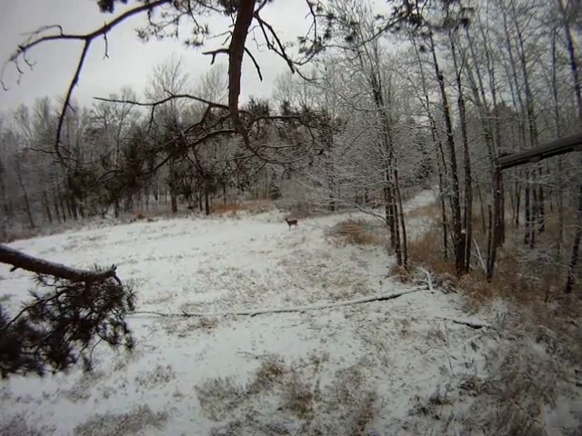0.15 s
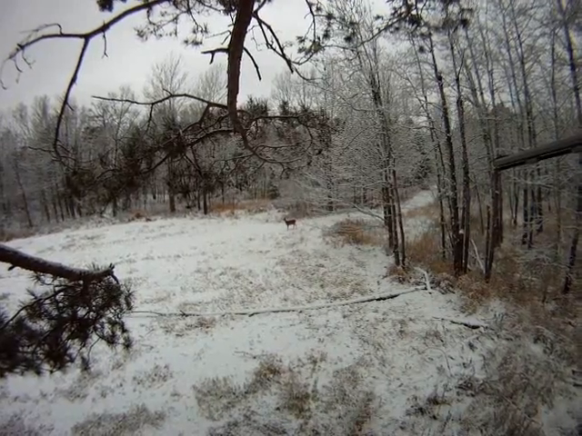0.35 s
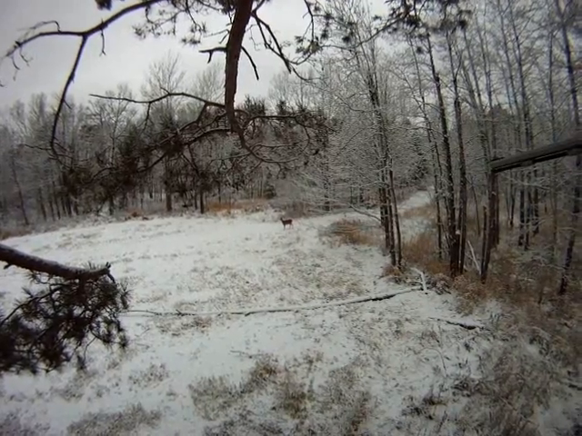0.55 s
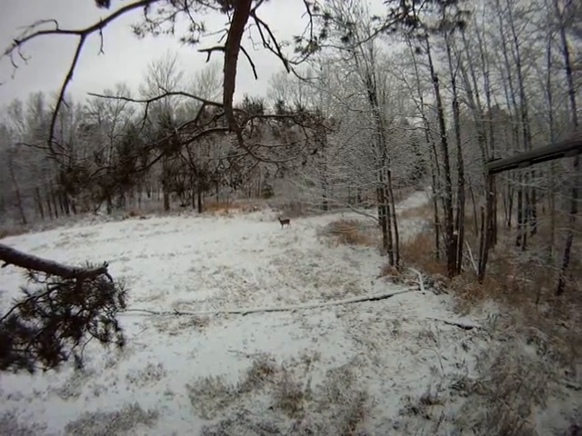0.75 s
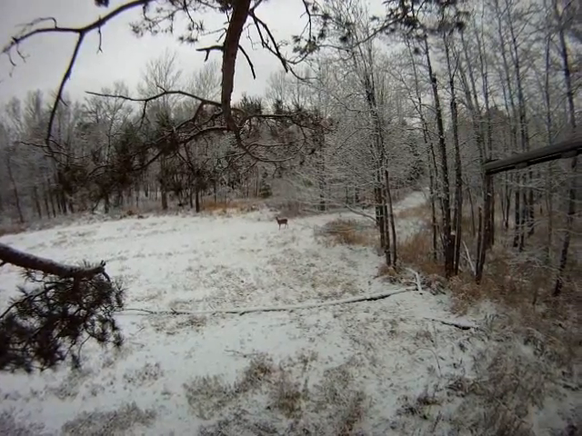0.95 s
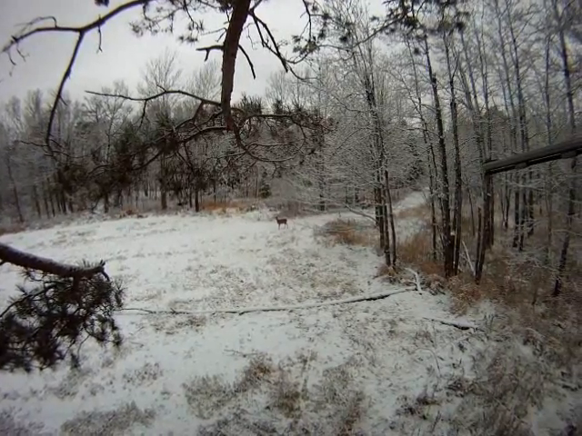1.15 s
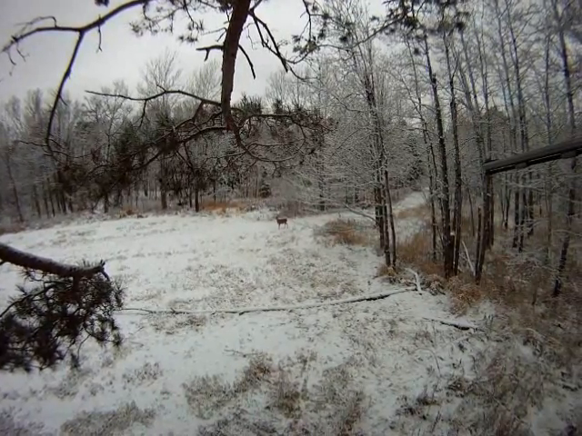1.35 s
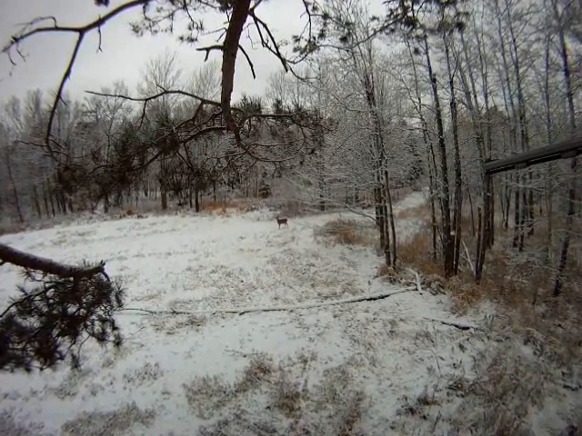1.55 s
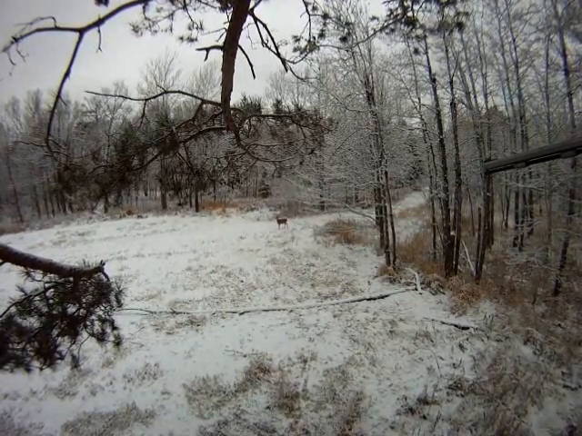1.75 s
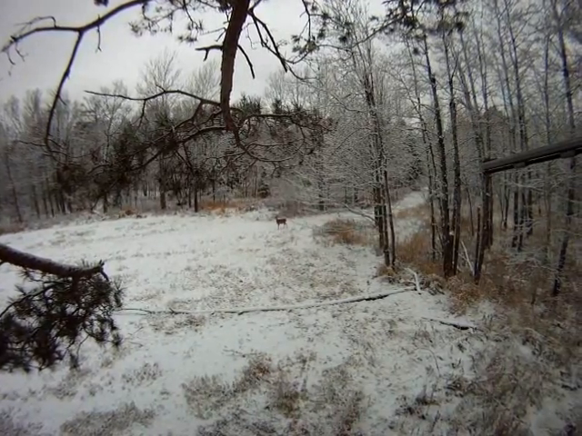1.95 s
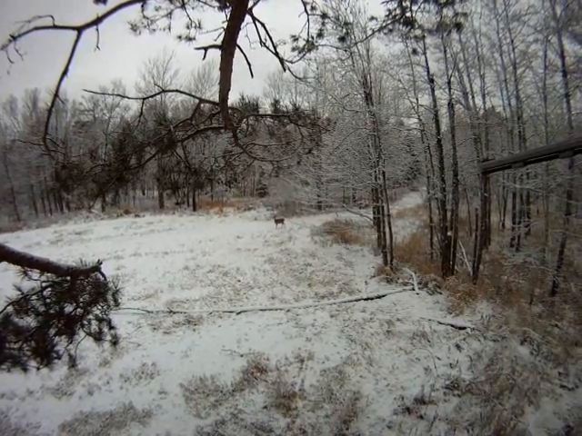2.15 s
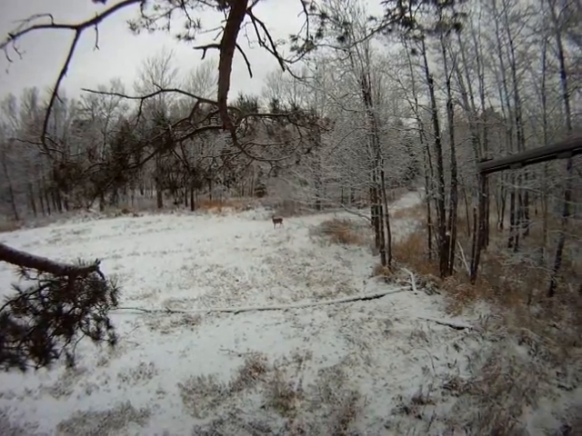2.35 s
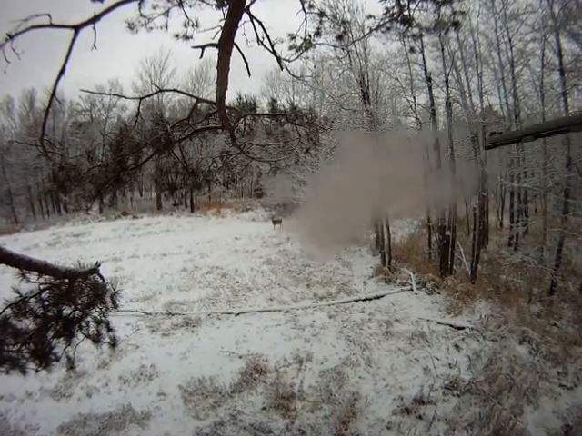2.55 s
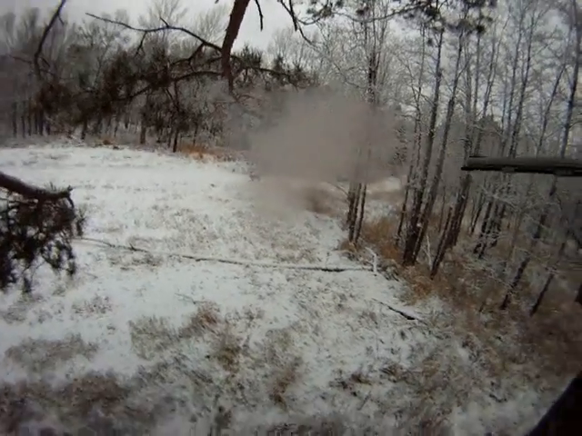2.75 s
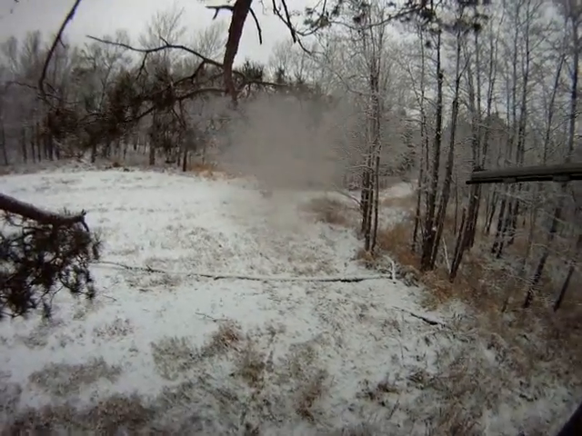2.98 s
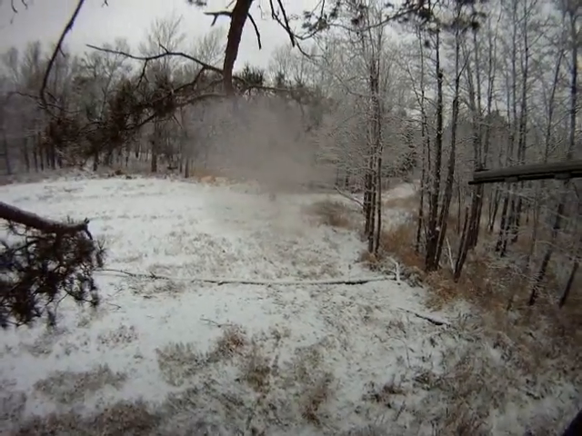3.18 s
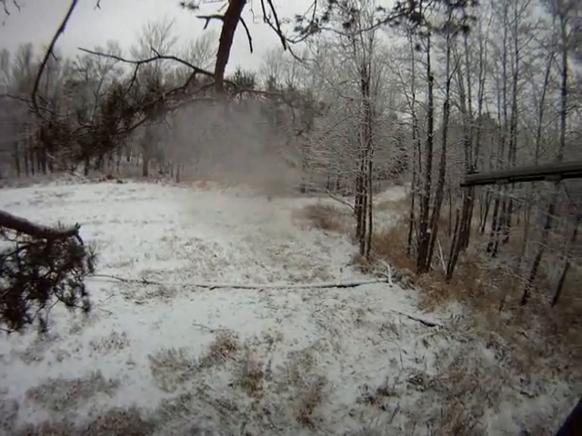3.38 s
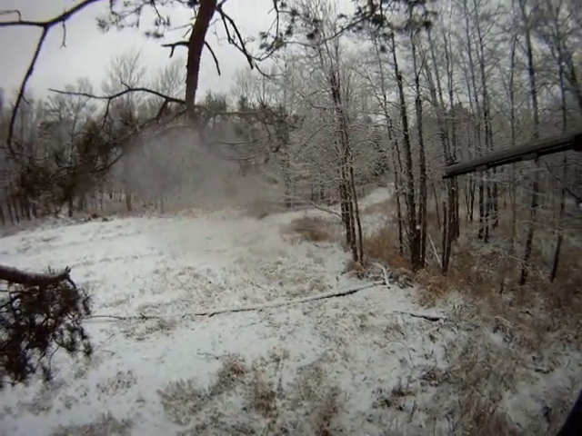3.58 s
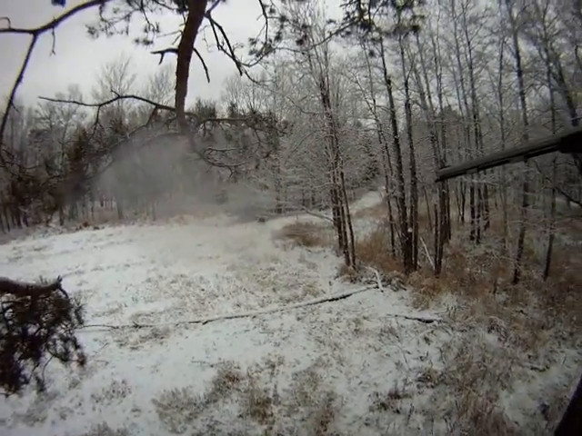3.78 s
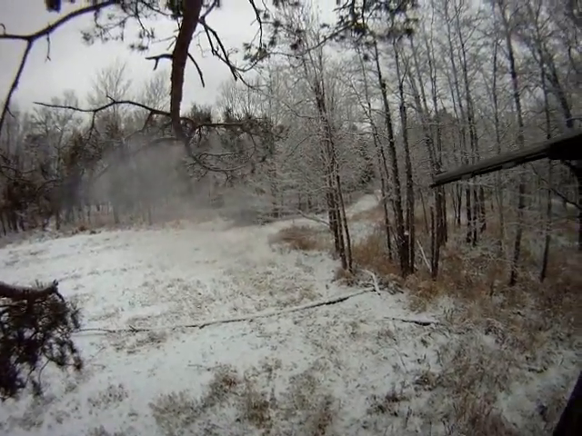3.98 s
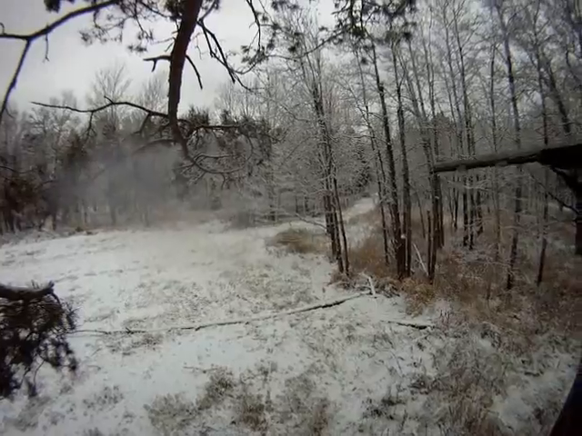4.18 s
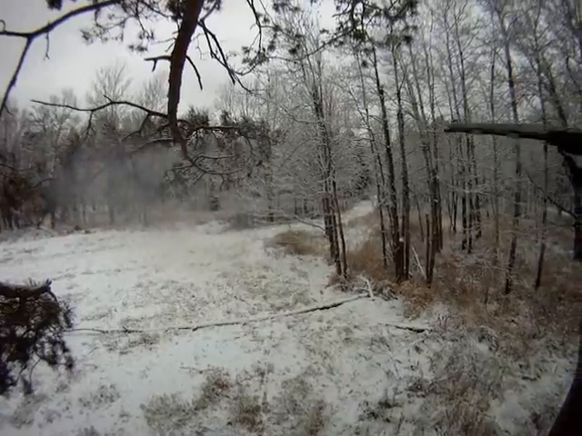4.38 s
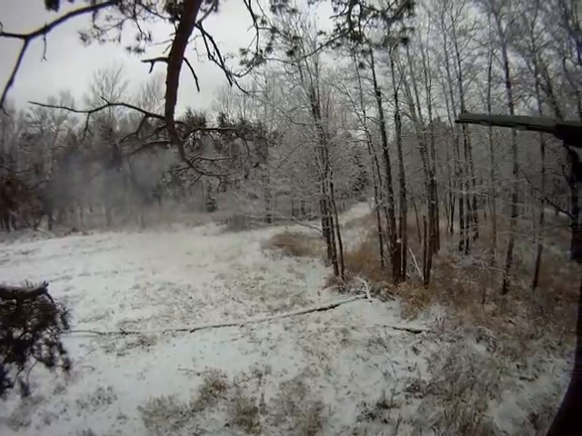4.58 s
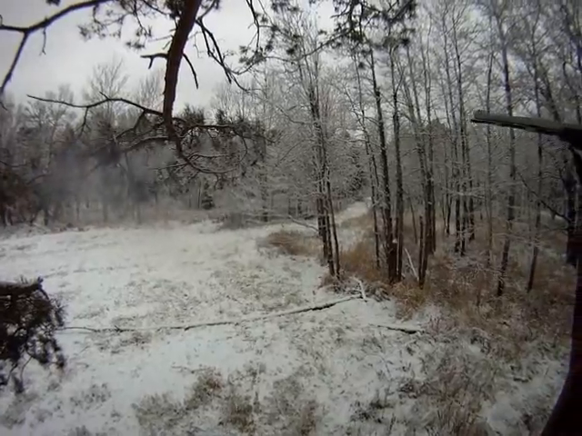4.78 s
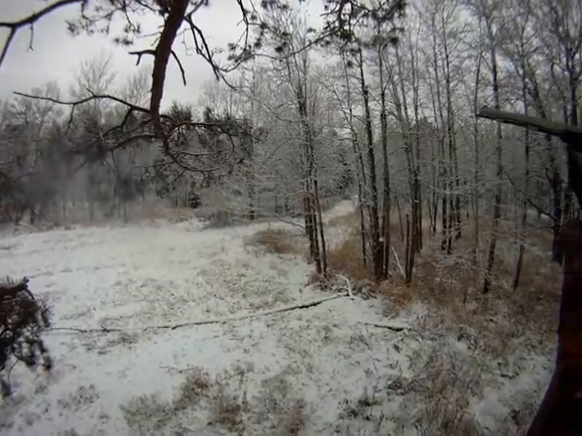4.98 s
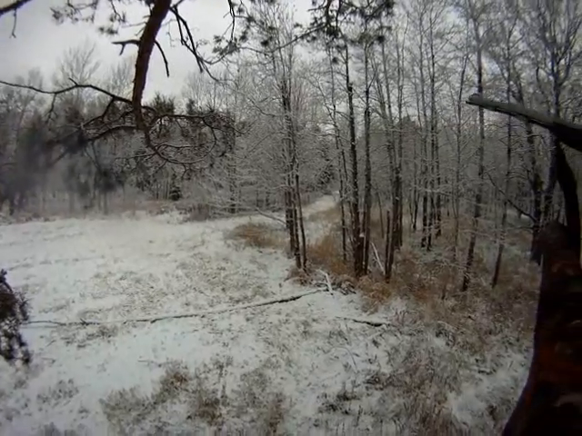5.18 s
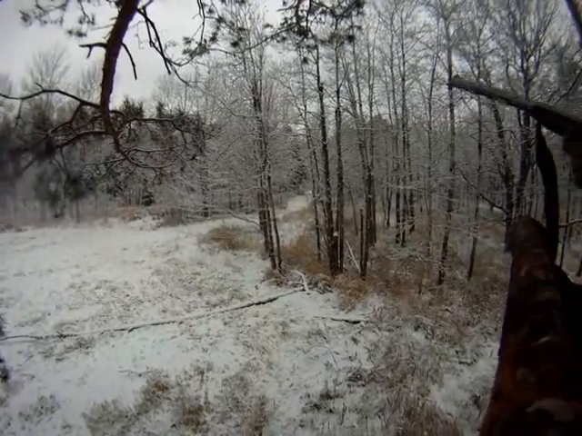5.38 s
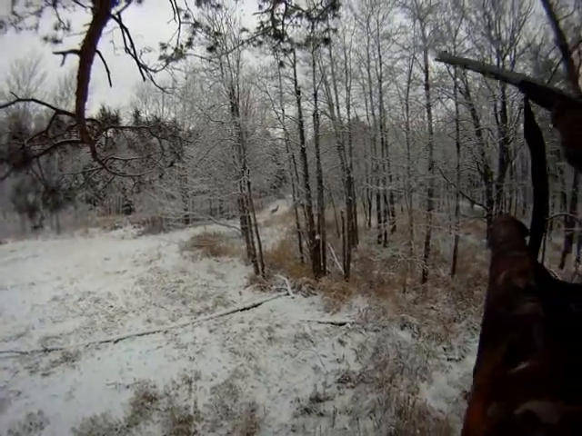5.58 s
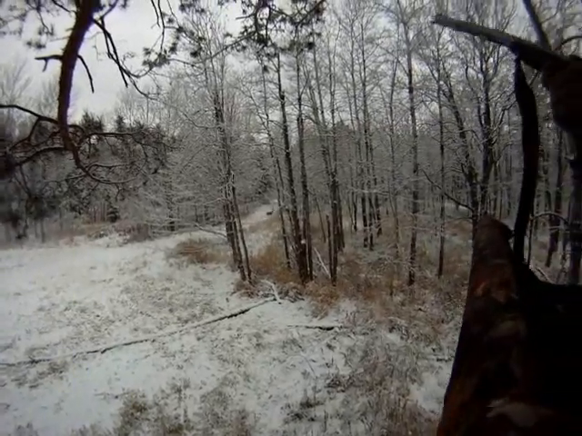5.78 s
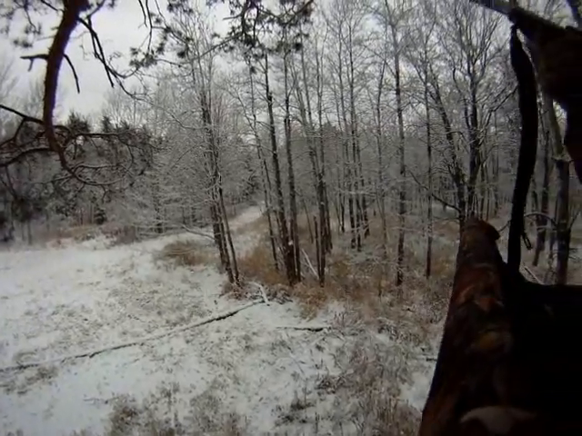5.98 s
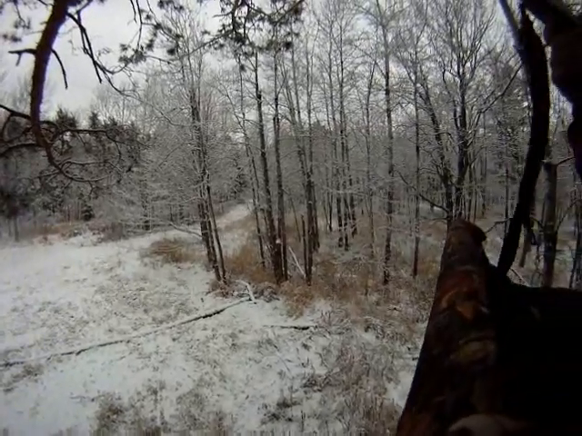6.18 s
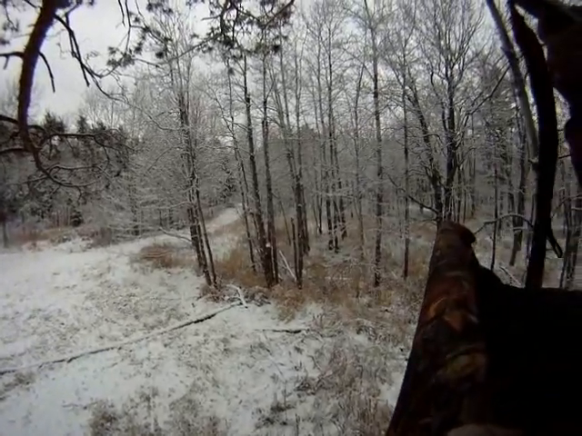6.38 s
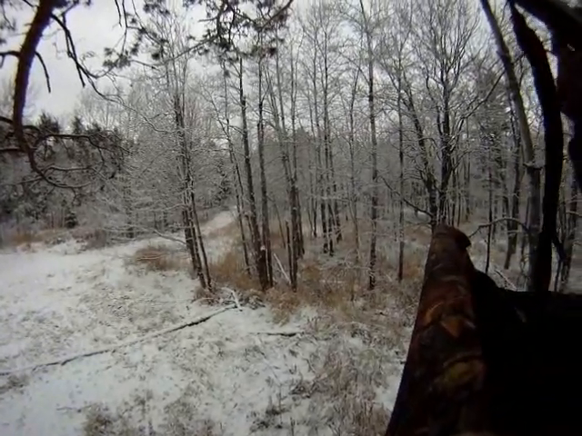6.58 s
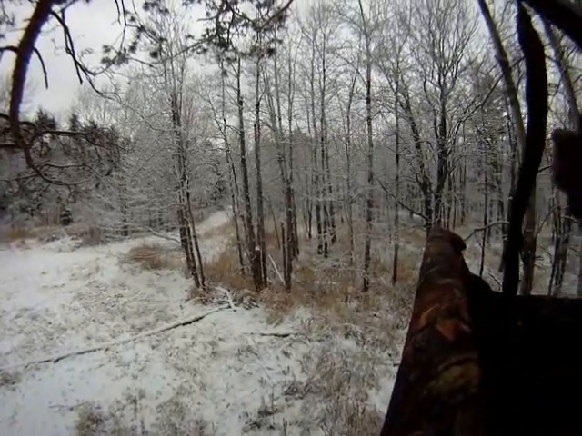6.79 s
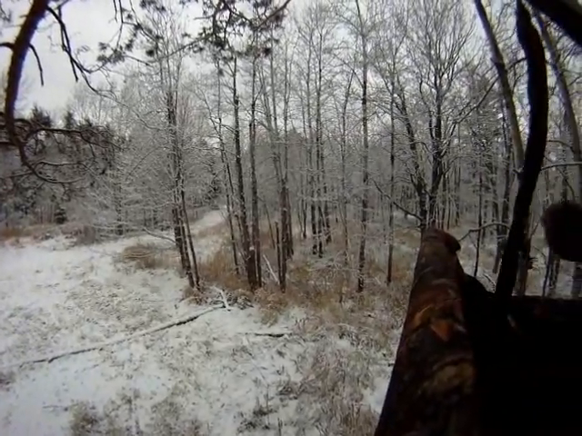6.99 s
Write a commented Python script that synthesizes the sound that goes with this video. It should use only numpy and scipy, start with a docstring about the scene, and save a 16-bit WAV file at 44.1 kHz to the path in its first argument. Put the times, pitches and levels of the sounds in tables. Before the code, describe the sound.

Quiet low rumble and faint ticks in a snowy clearing, then one sudden overloaded gunshot, woodland echoes, scratchy cloth rubbing and airy rustling.

```python
"""Low rumble, faint rustles and small ticks, then a gunshot with echoes, rubbing cloth and more rustling.
A muzzleloader is fired from a tree stand over a snowy clearing, near a microphone in a closed plastic case.
The shot is overloaded noise plus a pressure snap and a thump; trees scatter it back as dense clicks.
Cloth on the case and cloth in the air are clicks too, coloured by the hollow case; ticks are cracks with a ring.
Shaking of the mount is low noise that swells at each jolt, and soft hiss lies under it all."""
import sys
import numpy as np
from scipy import signal
from scipy.fft import rfft, irfft, next_fast_len
from scipy.io import wavfile
from scipy.ndimage import uniform_filter1d, map_coordinates

SR = 44100
rng = np.random.default_rng(int(sys.argv[2]) if len(sys.argv) > 2 else 0)


def to_wav(sig):
    """Store sig (one row per channel, or 1-D mono) as 16-bit WAV at the path in sys.argv[1].

    Samples outside -1..1 are clipped; the rate is SR.
    """
    pcm = np.clip(np.atleast_2d(sig), -1, 1) * 32767
    pcm = np.round(pcm).astype(np.int16)
    wavfile.write(sys.argv[1], SR, pcm.T)  # frames by channels


N = 310287   # length in samples, about 7 s

# Tables named _COLOUR, and the two hiss spectra, give the tone of a noise; its loudness is set elsewhere.
# Each row of those: frequency in Hz, relative level in dB per Hz.

# Wind and sway on the mount, before its random lumps. Each row: time in seconds, level in dB.
RUMBLE_LEVEL = [(0.0, -64.5), (0.4, -66), (1.2, -64.5), (1.9, -69.5), (2.3, -66), (2.6, -60), (3.1, -58.5),
                (3.5, -53.5), (4.1, -47), (4.4, -54.5), (4.9, -56), (5.5, -56), (5.7, -60), (6.2, -51.5),
                (6.6, -61), (7.04, -59)]
RUMBLE_COLOUR = [(8.8, -34.5), (15, -6), (38, 2.5), (60, 0), (85, -7), (199, -23), (339, -29), (400, -26),
                 (520, -62), (880, -120)]
LUMPS_DB, LUMPS_PER_S = 3, 21   # spread and speed of the random lumps
# Jolts of the mount. Each row: peak time in seconds, rms level in dB,
# seconds to rise or fall 20 dB before the tip is rounded.
JOLTS = [(0.57, -53, .06), (0.91, -56, .04), (2.515, -41, .05), (2.68, -39, .06), (2.77, -40, .08),
         (2.84, -41, .04), (3.0, -53, .06), (3.56, -44, .05), (3.71, -41, .07), (3.8, -37, .08),
         (3.91, -43, .08), (4.06, -41.5, .08), (4.18, -35, .1), (4.23, -35, .07), (4.33, -37.5, .1),
         (4.51, -42, .1), (4.67, -43, .05), (4.76, -48, .05), (5.04, -45, .05), (5.09, -42, .07),
         (6.25, -42.5, .06), (6.315, -44, .08), (6.48, -47, .09), (6.69, -53, .08)]
# Jolts are fuller than wind here. Each row: centre in Hz, width in Hz, boost in dB.
JOLT_BODY = [(96, 190, 2)]
CREST_DB = 4   # how far the tip of each swell is rounded off

# Clothing rustling through the air. Each row: time in seconds, level around 2 kHz in dB.
RUSTLE_LEVEL = [(0.0, -90), (0.4, -76), (0.83, -78), (1.1, -96), (5.13, -93), (5.17, -65.5), (5.236, -60),
                (5.282, -64.5), (5.392, -54.5), (5.438, -63), (5.604, -67), (5.75, -60.5), (5.852, -45),
                (5.91, -43.5), (5.946, -50.5), (6.008, -46.5), (6.04, -59), (6.084, -46.5), (6.1, -54),
                (6.2, -56), (6.26, -54.5), (6.38, -61.5), (6.425, -57.5), (6.46, -64), (6.568, -66.5),
                (6.598, -58.5), (6.734, -69.5), (6.926, -71), (7.03, -84.5)]
RUSTLE_COLOUR = [(150, -46), (250, -19.5), (385, -12), (466, -21.5), (781, -12), (867, -19), (1050, -7),
                 (1790, -10), (2160, -5), (6000, -40.5), (9560, -25), (12000, -35.5), (14500, -19.5),
                 (15500, -37)]
# The hollow case as airborne sound excites it. Each row: centre in Hz, width in Hz, boost (or cut) in dB.
CASE_AIRBORNE = [(387, 60, 3), (786, 70, 6), (1170, 130, 3), (1360, 89, 0.5), (2120, 620, 8.5),
                 (2660, 140, -3), (3620, 200, 8.5), (4400, 220, 7), (8400, 120, 2.5), (9860, 420, 13.5),
                 (14230, 360, 4.5)]
RUSTLE_TREBLE_DB = 1.9   # change per octave going up from 2 kHz
# Bass change per octave going down from 2 kHz, at the loud level; each dB fainter adds the last value
RUSTLE_BASS_DB, RUSTLE_LOUD_DB, BASS_GAIN_PER_DB = 0.43, -45.5, 0.1019

# Small ticks on the case. Each row: time in seconds, crack peak in dB, ring in dB against that peak.
TICKS = [(0.061, -56, -9), (0.1397, -56.5, -1), (0.189, -54, -11), (0.295, -51.5, -19), (0.54, -53, -10),
         (0.7171, -49.5, -9), (0.779, -56.5, -11), (0.853, -52, -17), (0.9805, -57.5, -8),
         (3.3489, -41.5, -11.5), (3.486, -30, -14), (3.687, -32, -29), (3.709, -16.5, -30),
         (3.731, -23, -26), (3.8878, -30, -8), (3.916, -28, -11), (4.032, -32, -11), (4.097, -37, -1.5),
         (4.3136, -35, -19), (4.4459, -25.5, -8.5), (4.4653, -30.5, -9), (4.4772, -24, -19),
         (4.5456, -32, -17), (4.6872, -28, -21), (4.719, -48, -17), (4.876, -46, -10), (4.901, -31.5, -7),
         (5.9005, -31, -6.5)]
TICK_RING_HZ, TICK_RING_T60_S = 2720, .009   # middle pitch; time to fade by 60 dB
TICK_RING_SPREAD = 0.049   # greatest share by which the pitch strays up or down
# Ticks hardly wake the low modes. Each row: centre in Hz, width in Hz, change in dB.
TICK_THIN = [(900, 1400, -8.5)]
# Air modes of the hollow case. Each row: centre in Hz, width in Hz, boost in dB.
CASE_MODES = [(370, 38, 3.5), (773, 76, 6), (1060, 90, 4.5), (1370, 120, 5.5), (1590, 430, 6.5),
              (1960, 200, 3), (2370, 170, 5.5), (2764, 110, 4), (3650, 340, 7.5), (7660, 150, 7.5),
              (8350, 250, 4), (9805, 160, 10.5), (13800, 2200, 8)]

# Muzzle blast. Each row: time in seconds, level in dB before overload.
BLAST_LEVEL = [(2.4685, -41), (2.4722, -25.5), (2.4736, 2.5), (2.4808, -6.5), (2.4832, -31.5),
               (2.4870, -32), (2.4980, -32.5), (2.5100, -36), (2.5300, -51)]
BLAST_COLOUR = [(150, -43), (250, -11), (624, -20), (1760, -8), (2400, -2.5), (2660, -15), (3110, -10),
                (6000, -22.5), (9890, -20), (12000, -55.5), (14000, -23.5), (14700, -17.5), (15500, -48.5)]
# The case rings with the blast. Each row: centre in Hz, width in Hz, boost in dB.
BLAST_RING = [(2380, 200, 0), (3050, 250, 2.5)]
# Suction after the blast, one row: start in seconds, end in seconds, depth in dB before it eases back, time
# constant of the settling in seconds.
SUCTION = (2.4770, 2.4816, -10.7, .0045)
GROUND_LAG_S, GROUND_DB = .0265, -15.0   # the ground's copy of the snap: delay and relative level
THUMP_S, THUMP_HZ = 2.4765, 181   # the blast knocks the case: start and pitch
THUMP_DB, THUMP_T60_S = -23.5, 0.11   # starting level; time to fade by 60 dB
BLAST_LIMIT = .46   # the overloaded blast noise cannot swing past this

# Echoes of the woods. Each row: time in seconds, level around 2 kHz in dB, treble change in dB per octave
# going up from 2 kHz, bass change in dB per octave going down from it.
ECHO_LEVEL = [(2.51, -55, 9, -4), (2.526, -44.5, 1.2, -4), (2.606, -39, 2, 0.5), (2.696, -33, 0.8, -2),
              (2.984, -44.5, 0.1, 1.7), (3.34, -58.5, -0.2, 3.5), (3.5, -57, -1.5, 3.3)]
ECHO_COLOUR = [(47, -33), (80, -4), (130, -11.5), (181, -3), (594, -7.5), (2000, -5), (2280, 0.5),
               (2720, -11), (3700, -12), (5880, -29), (9760, -17), (11100, -22), (11900, -39), (14200, -23),
               (15500, -42.5)]
# Nearer trees answer as distinct slaps. Each row: peak time in seconds, level around 2 kHz in dB,
# seconds to rise 20 dB, seconds to fall 20 dB, both before the tip is rounded.
SLAPS = [(2.552, -40, .02, .04), (2.704, -29, .02, .04), (2.778, -33, .02, .05), (2.845, -36, .03, .03)]

# Light contact of the cloth with the case. Each row: time in seconds, level in dB.
CONTACT_LEVEL = [(3.35, -64), (3.5, -48.5), (3.6, -57), (3.8, -52), (4.2, -42), (4.42, -73), (4.7, -52),
                 (4.83, -65), (4.88, -57), (4.97, -50.5), (5.13, -46), (5.16, -72)]
# Slips of the cloth. Each row: peak time in seconds, rms level in dB,
# seconds to rise 20 dB, seconds to fall 20 dB, both before the tip is rounded.
SLIPS = [(3.536, -42.5, 0.012, 0.012), (3.58, -39.0, 0.079, 0.014), (3.632, -44.0, 0.036, 0.063),
         (3.66, -34.5, 0.016, 0.114), (3.688, -32.0, 0.024, 0.012), (3.708, -24.5, 0.012, 0.024),
         (3.729, -28.0, 0.012, 0.022), (3.781, -27.5, 0.015, 0.041), (3.817, -36.5, 0.015, 0.037),
         (3.876, -36.5, 0.027, 0.034), (3.888, -31.5, 0.012, 0.012), (3.915, -41.0, 0.012, 0.012),
         (3.94, -37.5, 0.021, 0.031), (3.974, -42.5, 0.012, 0.025), (4.041, -35.0, 0.029, 0.022),
         (4.106, -36.0, 0.056, 0.012), (4.145, -33.0, 0.054, 0.065), (4.204, -36.5, 0.025, 0.069),
         (4.262, -35.5, 0.016, 0.039), (4.322, -36.5, 0.044, 0.055), (4.355, -38.0, 0.012, 0.048),
         (4.48, -37.5, 0.047, 0.023), (4.502, -39.5, 0.084, 0.012), (4.545, -36.0, 0.032, 0.024),
         (4.563, -47.5, 0.012, 0.173), (4.628, -37.0, 0.018, 0.069), (4.688, -32.5, 0.012, 0.012),
         (4.72, -37.5, 0.013, 0.018), (4.756, -45.0, 0.12, 0.026), (5.019, -37.0, 0.032, 0.02),
         (5.05, -38.5, 0.021, 0.05), (5.086, -36.5, 0.071, 0.032), (5.122, -37.0, 0.031, 0.021)]
RUB_COLOUR = [(120, -54.5), (200, -27), (345, -14.5), (506, -22), (1050, -3), (1210, -8), (2250, -0.5),
              (3180, -17), (4410, -16), (6020, -31), (9660, -16.5), (10800, -15.5), (11800, -49.5),
              (14200, -16), (15500, -39)]
RUB_TREBLE_DB, RUB_BASS_DB = 0.33, 0.72   # changes per octave going up and down from 2 kHz, firm touch
LIGHT_TOUCH_DB, BRIGHTER_PER_DB = -43, 0.05   # below this level the rub thins and brightens

# Narrow dips in the treble near 6 and 12 kHz. Each row: centre in Hz, width in Hz, change in dB.
TREBLE_DIPS = [(5973, 390, -10), (12240, 1500, -24)]
# The same two dips, partly filled, in the hiss. Each row: centre in Hz, width in Hz, change in dB.
HISS_DIPS = [(6040, 560, -11), (12300, 1300, -10)]
# The microphone's own noise. Each row: frequency in Hz, relative level in dB per Hz.
MIC_HISS = [(35, -34), (60, -8.5), (85, 0.5), (107, -2), (385, -11.5), (423, -13.5), (464, -11.5),
            (1100, -16), (2250, -19), (15500, -33.5)]
MIC_HISS_DB = -68.5
# Faint wide hiss, opposite in the two channels. Each row: frequency in Hz, relative level in dB per Hz.
WIDE_HISS = [(59, -32), (100, -0.5), (4040, -3.5), (5400, -4), (6060, -24), (6800, -6), (8410, -8),
             (10000, -24), (13000, -55), (22000, -120)]
WIDE_HISS_DB = -82.5   # greatest level; it is quieter where treble is loud
CEILING, CUTOFF_HZ = .58, 15950   # clipping level; top of the treble


def amp(db):
    """Turn dB into a gain."""
    return 10 ** (np.asarray(db) / 20)


def rms_one(x):
    """Scale to an rms (average strength) of 1."""
    return x / np.sqrt(np.mean(x ** 2) + 1e-20)


def in_time(rows):
    """Give each column of a timed table at every sample; the level drops to -110 dB outside the table."""
    first, last = rows[0], rows[-1]
    before = (first[0] - .004, -110, *first[2:])
    after = (last[0] + .03, -110, *last[2:])
    s, *columns = np.transpose([before, *rows, after])
    return [np.interp(np.arange(N) / SR, s, c) for c in columns]


def colour(x, spectrum, bumps=(), order=2):
    """Filter to a spectrum plus bumps, with no sound ahead of time; a higher order squares the bumps."""
    size = 8192
    hz = np.arange(size // 2 + 1) * SR / size
    table_hz, table_db = np.array(spectrum).T
    db = np.interp(np.log(hz + 1), np.log(table_hz), table_db)
    for centre_hz, width_hz, bump_db in bumps:
        db = db + bump_db / (1 + (2 * (hz - centre_hz) / width_hz) ** order)
    # Folding the cepstrum forward gives the minimum-phase filter
    cepstrum = irfft(db * np.log(10) / 20)
    cepstrum[1:size // 2] *= 2
    cepstrum[size // 2 + 1:] = 0
    response = irfft(np.exp(rfft(cepstrum)))
    return signal.fftconvolve(x, response)[:len(x)]


def drift(rate):
    """Smooth random wandering with a spread near 1 and about rate changes a second."""
    knots = rng.standard_normal(4000)
    return map_coordinates(knots, [np.arange(N) / SR * rate * 2], order=3, mode="wrap")


def tilted(x, treble_db, bass_db, patchy_db, rate):
    """Tilt half-octave bands above and below 2 kHz by dB per octave, and let each flicker by itself."""
    size = next_fast_len(N)
    spectrum = rfft(x, size)
    hz = (np.arange(size // 2 + 1) + 1) * SR / size
    step = np.clip(2 * np.log2(hz / 2000), -5, 5)   # half octaves from 2 kHz
    out = np.zeros(N)
    for k in range(-5, 6):
        share = np.cos(np.pi / 2 * np.clip(step - k, -1, 1)) ** 2
        band = irfft(spectrum * share, size)[:N]
        slope_db = treble_db if k > 0 else bass_db
        out += band * amp(slope_db * abs(k) / 2 + patchy_db * drift(rate))
    return out


def grains(per_s, spread_db):
    """Random clicks of very uneven size, up or down."""
    sizes = amp(spread_db * np.minimum(rng.exponential(1, N), 5))
    signs = rng.choice([-1, 1], N)
    return sizes * signs * (rng.random(N) < per_s / SR)


def swells(base, rows):
    """Add, in power, round-topped swells whose sides rise and fall at a nearly steady rate in dB."""
    power = base ** 2
    for s, peak_db, rise_s, fall_s in rows:
        i = slice(max(int((s - .4) * SR), 0), int((s + .4) * SR))
        t = np.arange(N)[i] / SR - s
        down_db = 20 * np.where(t < 0, -t / max(rise_s, .004), t / max(fall_s, .004))
        power[i] += amp(peak_db + CREST_DB - np.hypot(down_db, CREST_DB)) ** 2
    return np.sqrt(power)


def rumble():
    """Wind and sway shake the microphone as lumpy low noise, with a fuller swell at each jolt."""
    wind = rms_one(colour(rng.standard_normal(N), RUMBLE_COLOUR))
    shake = rms_one(colour(rng.standard_normal(N), RUMBLE_COLOUR, JOLT_BODY))
    jolts = swells(np.zeros(N), [(s, db, width_s, width_s) for s, db, width_s in JOLTS])
    wind_db = in_time(RUMBLE_LEVEL)[0] + LUMPS_DB * drift(LUMPS_PER_S)
    return amp(wind_db) * wind + jolts * shake


def mic_hiss():
    """The microphone's own steady noise, with the treble dips partly filled."""
    return amp(MIC_HISS_DB) * rms_one(colour(rng.standard_normal(N), MIC_HISS, HISS_DIPS, order=4))


def wide_hiss(dry):
    """Faint hiss, opposite in the two channels so it sounds wide, quieter where treble is loud."""
    steps = np.diff(dry[0], prepend=0)   # sample-to-sample change, so treble counts most
    loudness = np.sqrt(uniform_filter1d(steps ** 2, size=3000) + 1e-20)
    hiss = amp(WIDE_HISS_DB) * rms_one(colour(rng.standard_normal(N), WIDE_HISS))
    return hiss / (1 + (loudness / amp(-67.0)) ** 2) * [[1], [-1]]


def rustle():
    """Fabric fibres make soft, nearly smooth noise through the air; fainter rustle is fuller in the bass."""
    level_db, = in_time(RUSTLE_LEVEL)
    bass_db = RUSTLE_BASS_DB + BASS_GAIN_PER_DB * (RUSTLE_LOUD_DB - level_db)
    fabric = rms_one(colour(grains(14000, spread_db=2.5), RUSTLE_COLOUR, CASE_AIRBORNE))
    flickering = tilted(fabric, RUSTLE_TREBLE_DB, bass_db, patchy_db=1.5, rate=7.6)
    return amp(level_db + 0.45 * drift(30)) * flickering


def ticks():
    """Each tick is a few close cracks that wake the case, plus a short bright ring of the part that moved."""
    rings, cracks = np.zeros(N), np.zeros(N)
    t = np.arange(400) / SR
    chance = rng.random((len(TICKS), 4))
    for (s, peak_db, ring_db), (detune, *lags) in zip(TICKS, chance):
        i = round(s * SR) + 12
        ring_hz = TICK_RING_HZ * (1 + TICK_RING_SPREAD * (2 * detune - 1))
        fade = amp(peak_db + ring_db - 60 * t / TICK_RING_T60_S)
        rings[i:i + len(t)] += fade * np.sin(2 * np.pi * ring_hz * t)
        cracks[i] = amp(peak_db)
        # Up to three weaker cracks follow within 3 ms
        later = i + 9 + (np.array(lags) * 110).astype(int)
        cracks[later] = amp(peak_db - 17.0) * np.array([-1, 1, -1])
    response = colour(np.eye(1, 2000)[0], RUB_COLOUR, CASE_MODES + TICK_THIN)
    return rings + signal.fftconvolve(cracks, response / np.abs(response).max())[:N]


def shot():
    """Overloaded gas noise rides on suction that builds and snaps back; the ground returns the snap."""
    t = np.arange(N) / SR
    noise = rms_one(colour(rng.standard_normal(N), BLAST_COLOUR, BLAST_RING))
    blast = noise * amp(in_time(BLAST_LEVEL)[0])
    overloaded = BLAST_LIMIT * np.tanh(blast / BLAST_LIMIT)

    start, end, suction_db, settle_s = SUCTION
    suction = -amp(suction_db) * (t - start) / (end - start) * (t > start) * (t < end)
    settle = np.exp(-1 / (settle_s * SR))   # the pressure overshoots as it returns, then fades
    snap = signal.lfilter([1, -1], [1, -settle], uniform_filter1d(suction, size=50))
    ground = amp(GROUND_DB) * np.roll(snap, round(GROUND_LAG_S * SR))

    after = np.maximum(t - THUMP_S, 0)
    thump = amp(THUMP_DB - 60 * after / THUMP_T60_S) * np.sin(2 * np.pi * THUMP_HZ * after)
    return overloaded + snap + ground + thump


def woods():
    """Countless trunks scatter the shot back, duller from afar; sound from all sides blurs the case modes."""
    level_db, treble_db, bass_db = in_time(ECHO_LEVEL)
    blurred = [(hz, 1.6 * width_hz, .45 * boost_db) for hz, width_hz, boost_db in CASE_MODES]
    scatter = rms_one(colour(grains(9000, spread_db=2.5), ECHO_COLOUR, blurred))
    return swells(amp(level_db), SLAPS) * tilted(scatter, treble_db, bass_db, patchy_db=0.0, rate=35)


def cloth():
    """Fibres catch and let go: dense grains and sparse snaps in a light contact, with slips that swell and die."""
    level = swells(amp(in_time(CONTACT_LEVEL)[0]), SLIPS)
    thin_db = BRIGHTER_PER_DB * np.clip(LIGHT_TOUCH_DB - 20 * np.log10(level), 0, 20)
    dense = rms_one(grains(7000, spread_db=2.5))
    sparse = rms_one(grains(600, spread_db=3.5))
    catches = colour(dense + amp(-7.0) * sparse, RUB_COLOUR, CASE_MODES)
    rub = tilted(catches, RUB_TREBLE_DB + thin_db, RUB_BASS_DB - thin_db, patchy_db=1.67, rate=18)
    return level * amp(0.71 * drift(70)) * rms_one(rub)


def scene():
    """All the sounds share the treble dips; the microphone adds hiss and feeds both channels."""
    outside = rumble() + rustle() + ticks() + shot() + woods() + cloth()
    nearly_flat = [(20, 0.0028), (20000, 0.0042)]
    dipped = colour(outside, nearly_flat, TREBLE_DIPS, order=4)
    capsule = dipped + mic_hiss()
    return np.array([capsule, capsule])


def record(dry):
    """Add the wide hiss, clip the peaks, then cut the top treble."""
    clipped = np.clip(dry + wide_hiss(dry), -CEILING, CEILING)
    top_cut = signal.cheby2(12, 70, CUTOFF_HZ, fs=SR, output="sos")
    return signal.sosfilt(top_cut, clipped)


dry = scene()
out = record(dry)
to_wav(out)
```